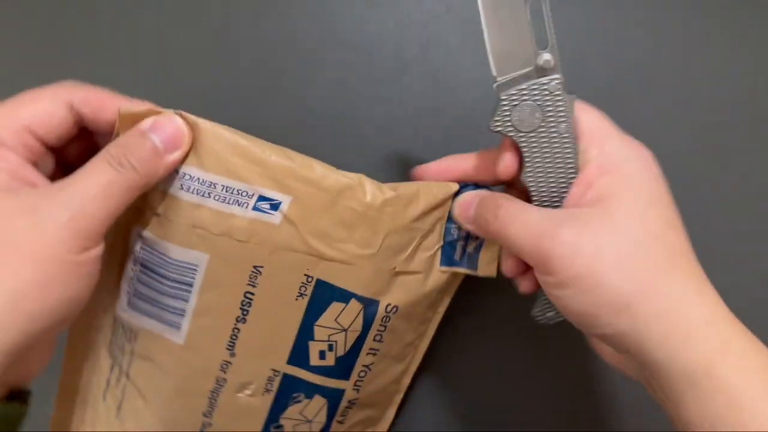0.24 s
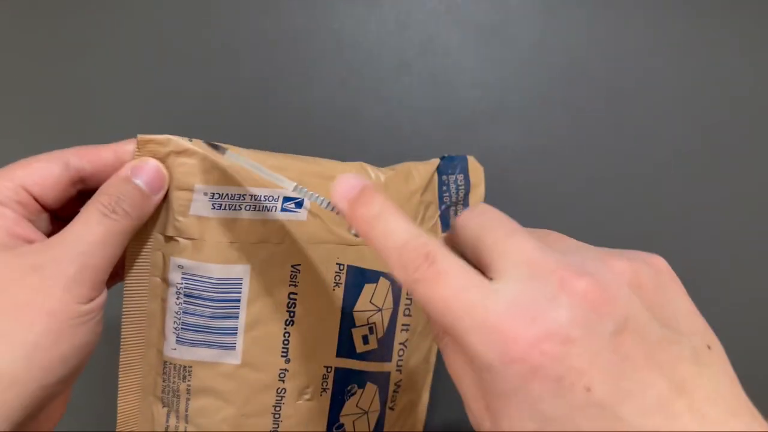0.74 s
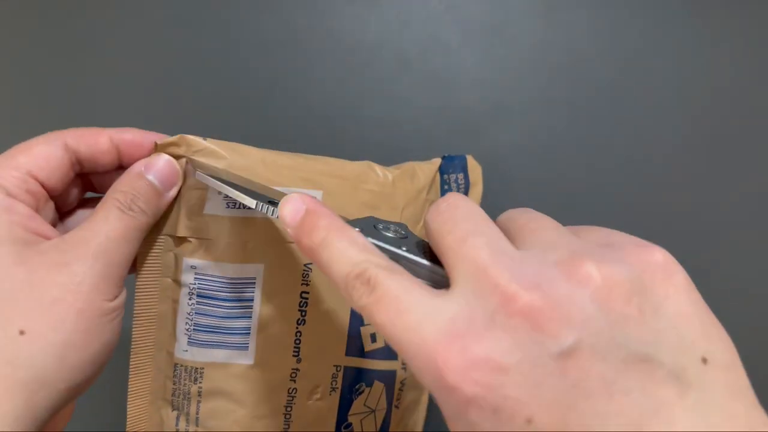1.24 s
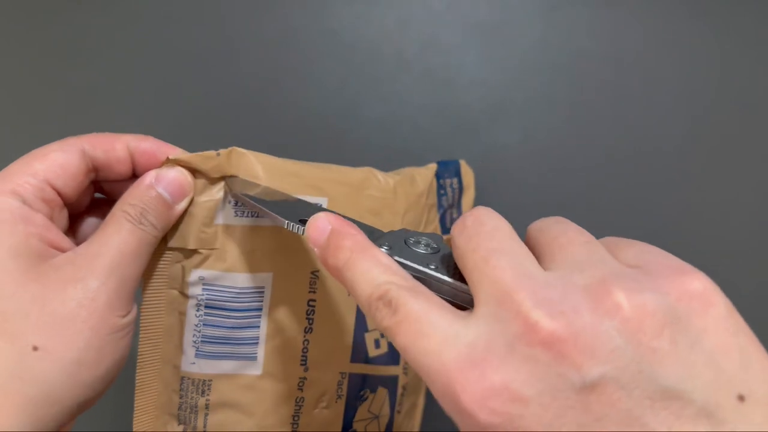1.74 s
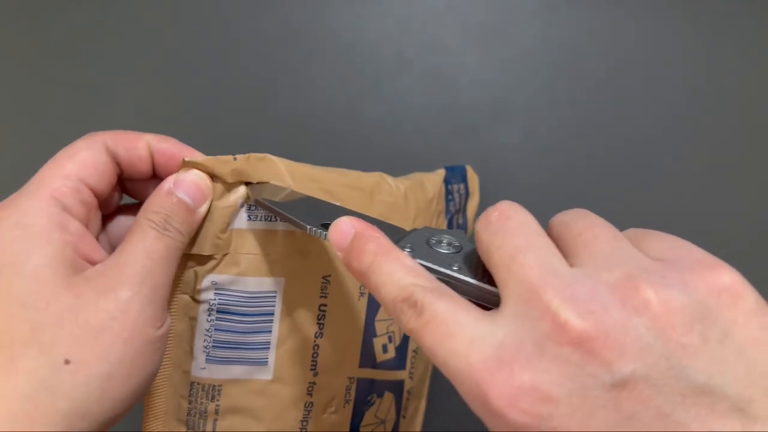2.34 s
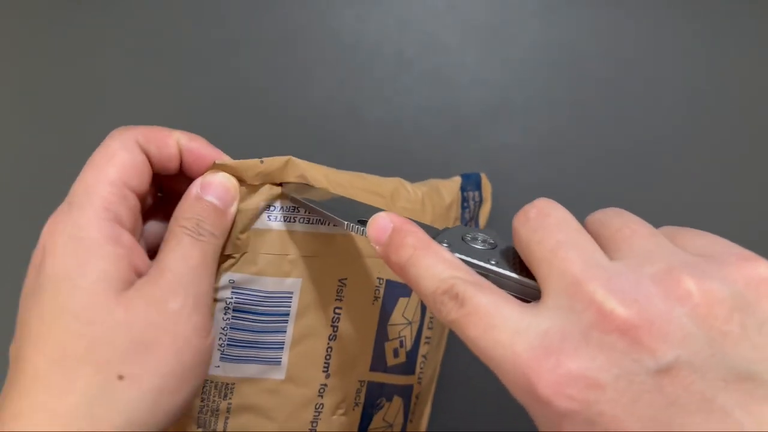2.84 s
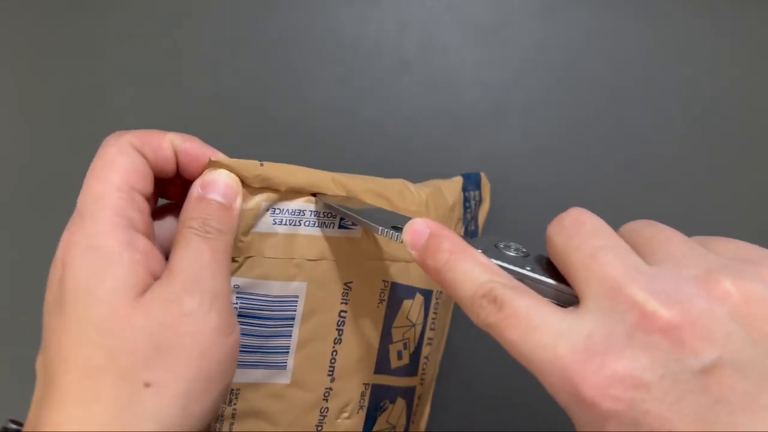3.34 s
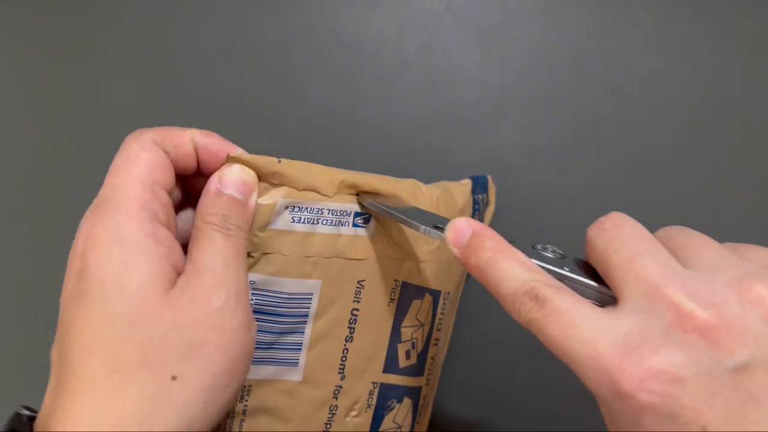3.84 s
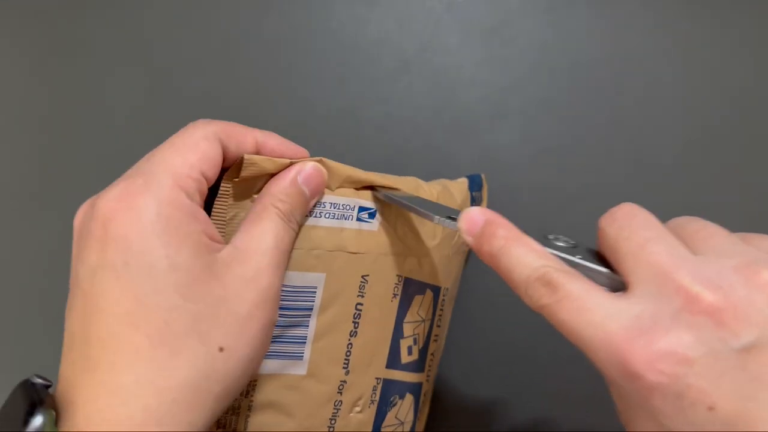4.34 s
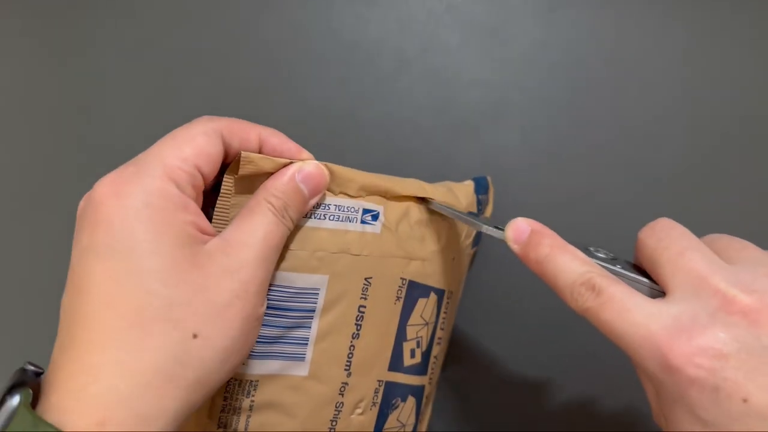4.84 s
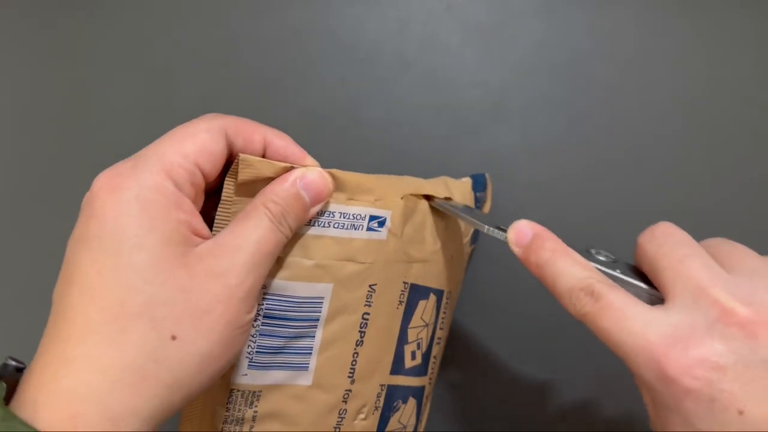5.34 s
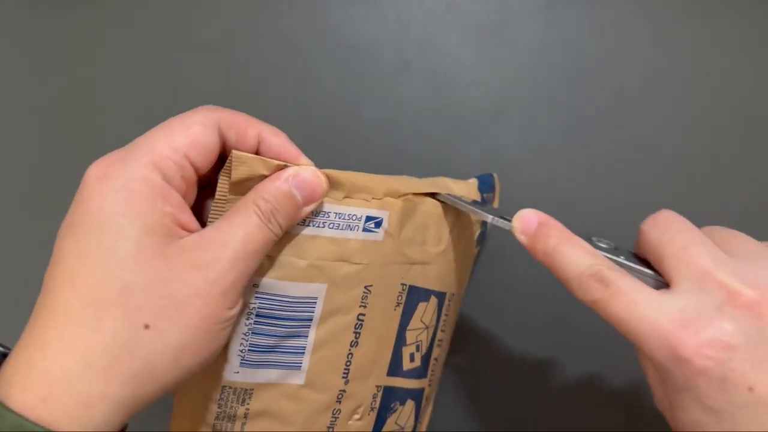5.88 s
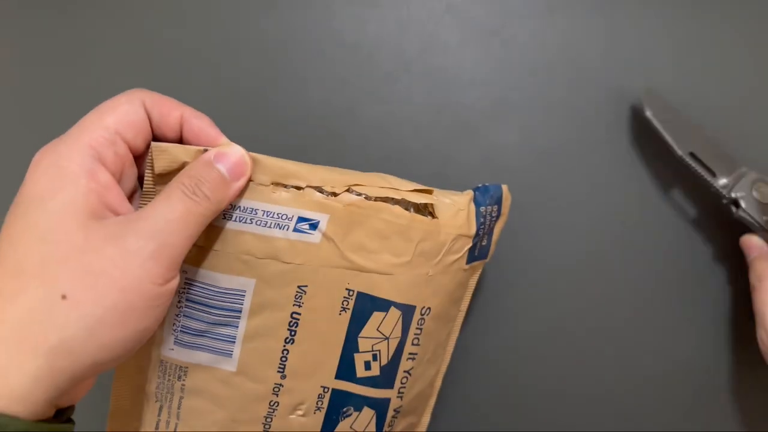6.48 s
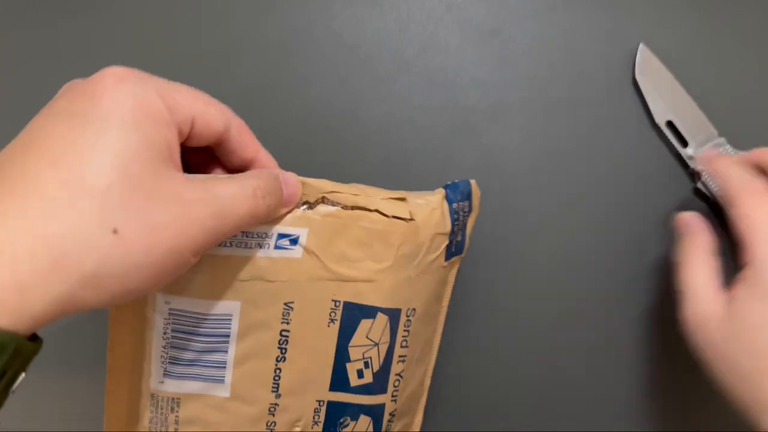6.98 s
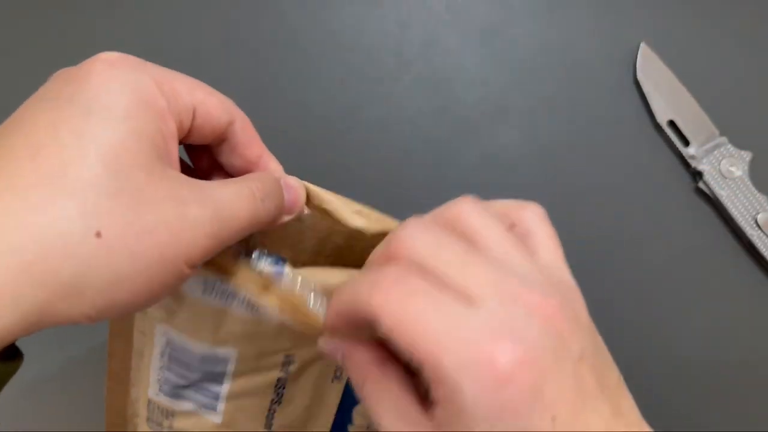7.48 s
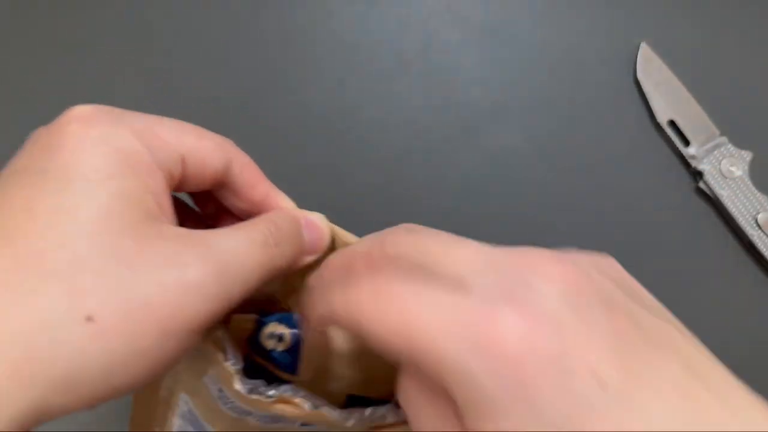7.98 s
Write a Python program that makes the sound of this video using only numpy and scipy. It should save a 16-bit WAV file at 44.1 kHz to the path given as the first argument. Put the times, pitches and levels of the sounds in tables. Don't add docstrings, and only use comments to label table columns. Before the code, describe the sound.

A padded paper mailer crackles in sharp irregular bursts as a blade slits its edge, then is pulled open and rummaged through, close up.

```python
import sys
import numpy as np
from scipy import signal
from scipy.fft import rfft, irfft, next_fast_len
from scipy.io import wavfile
from scipy.ndimage import uniform_filter1d

SR = 44100
rng = np.random.default_rng(int(sys.argv[2]) if len(sys.argv) > 2 else 0)


def voltage_ratio(level):
    return 10 ** (np.asarray(level, float) / 20)


def put_to_file(sound):
    columns = np.atleast_2d(sound).T
    safe = np.clip(columns, -1, 1)
    whole_steps = np.round(safe * 32767)
    wavfile.write(sys.argv[1], SR, whole_steps.astype(np.int16))


N = 362281

# (pitch [Hz], level per Hz [dB])
AIR = [(30, 20.5), (60, 14.5), (120, 14), (400, 6), (850, -6), (2200, -21), (4900, -10.5), (7300, -13),
       (10000, -25), (13000, -46), (16000, -6)]
# (time [s], held [s], rustle level [dB], fine part [dB])
MOVES = [(.0, 0.12, -48, -3), (0.132, 0.075, -47, 2), (0.299, 0.16, -54, 0), (1.0, 0.12, -64, -20),
         (1.505, 0.075, -56.5, 3), (2.036, 0.12, -66.5, 11.5), (2.28, 0.028, -61.5, 5.5),
         (2.432, 0.038, -56, 5.5), (2.71, 0.16, -57.5, 6), (2.96, 0.2, -56.5, 1), (3.25, 0.033, -54.5, 1),
         (3.41, 0.023, -58, 6), (3.57, 0.13, -58.5, -2), (3.828, 0.26, -53.5, 3.5),
         (4.198, 0.2, -55.5, 1.5), (4.5, 0.2, -62.5, 2), (4.658, 0.065, -63.5, 9), (4.79, 0.073, -54, 2.5),
         (5.093, 0.035, -52, 5.5), (5.287, 0.026, -48, -1), (5.46, 0.094, -53, -3), (5.73, 0.064, -51, -2),
         (5.891, 0.093, -42, -8), (6.04, 0.065, -52, -1), (6.33, 0.063, -56.5, 0), (6.559, 0.17, -60, 0),
         (6.81, 0.016, -55, 2), (6.86, 0.092, -51, 0), (7.112, 0.2, -49, 5), (7.24, 0.35, -49.5, 1.5),
         (7.38, 0.19, -44, 8), (7.66, 0.088, -55, 7), (7.81, 0.37, -49.5, 5.5)]
# (pitch [Hz], level [dB])
PAPER = [(60, -24), (230, -9.5), (400, 1.5), (1100, -3.5), (2000, 3.5), (3300, -1.5), (5200, 2.5),
         (7500, 3.5), (10000, 9), (12500, -12), (15500, 3)]
# (time [s], peak [dB], bright
# share [dB])
TICKS = [(.0839, -23, -14), (.1098, -21, -3), (.1203, -28, -2), (.1733, -18.5, -1.5),
         (.2202, -13, -10.5), (.2392, -29, -13), (.2526, -24.5, -30), (.3782, -28, 8), (.4268, -49, -23),
         (.5176, -33.5, -3), (.6031, -33, -4.5), (.6893, -31.5, -32), (.7612, -25, -33),
         (.7848, -30, -6), (.8164, -27.5, -14), (.8241, -35, 3), (.8489, -28, -2), (.9989, -25, -31),
         (1.0158, -23, -5.5), (1.0845, -40, 3), (1.1691, -30, -7), (1.2568, -23.5, -1.5),
         (1.422, -39, -9),
         (1.5047, -35, -61), (1.5507, -22.5, -1.5), (1.6141, -26, -16), (1.636, -40.5, 20),
            (1.6597, -30.5, -12), (1.6747, -34, 17), (1.827, -44, 9), (1.9575, -49.5, 14.5),
            (2.0357, -23.5, -5.5), (2.0605, -29, -5), (2.0795, -19.5, 2.5), (2.111, -27.5, 0.5),
            (2.2801, -33.5, -20), (2.2943, -22, -2), (2.4418, -27, -36), (2.4884, -14.5, -24),
            (2.5058, -19.5, -3.5), (2.7198, -27.5, -61), (2.7425, -17.5, 3.5), (2.841, -27.5, 1),
            (2.858, -22, -5.5), (2.8749, -31, -16), (2.9097, -21, 1),
         (3.266, -30, -13), (3.3142, -21.5, -1), (3.412, -19.5, -1.5), (3.425, -21, -1.5),
           (3.878, -28.5, -47), (3.9808, -22, -7), (4.0541, -24, -3), (4.0822, -21.5, -1.5),
           (4.2093, -19.5, -2), (4.224, -51, -16), (4.262, -42, -1), (4.319, -24.5, -5), (4.333, -24, -6),
           (4.3665, -23.5, -8), (4.598, -29.5, -1.2), (4.6485, -20, -2.5), (4.7754, -26, -1),
           (4.977, -32.5, -16), (5.0173, -25.5, -11), (5.2082, -27, -8), (5.3588, -27.5, -12),
           (5.463, -26, -14), (5.5558, -27, -2.5), (5.585, -28.5, -15), (5.7215, -27, -10),
           (5.745, -26, -14), (6.0155, -18.5, -6.5),
         (6.0954, -26, -15), (6.1529, -48, 15), (6.3173, -47, 11), (6.355, -27, -7.5),
            (6.4248, -32.5, -26), (6.198, -35.5, 6.5), (6.5703, -37, 12.5), (6.583, -23, -15),
            (6.6238, -30.5, -5), (6.8257, -37, -33), (6.8576, -30.5, -7), (6.94, -24.5, -4),
            (7.0146, -30.5, -7), (7.1162, -25.5, -13), (7.1718, -25.5, -13), (7.2212, -26, -4)]
# (time [s], peak [dB], bright share [dB], pouch boom [dB])
SLITTING = [(2.962, -18.5, -11, -14), (2.9858, -17, -22, -11), (3.0024, -8.5, -4.5, -7),
            (3.008, -18, 3.5, -4.5), (3.0208, -13, -11, -4), (3.0302, -15, -5, -2), (3.045, -21, -12, -1.5),
            (3.185, -16.5, -1.5, -17.5), (3.2933, -26, -14, -12), (3.459, -19, -7, -34),
            (3.4703, -13, -37, 3.5), (3.4814, -15, -11, -24), (3.4898, -14.5, -5.5, 0),
            (3.5175, -5, -3, -13.5), (3.531, -25, 8, -19), (3.5726, -14.5, -1.5, 3),
            (3.8102, -18.5, -2, -13.5), (4.0022, -22, -0.5, -8.5), (4.299, -14.5, -7, 0),
            (4.409, -25, -5.5, -5)]
# (time [s], peak [dB], bright share [dB], pouch boom [dB])
JERKING = [(4.4769, -12.5, -24, -4), (4.497, -11.5, -18, -9), (4.502, -26, -17, -17), (4.507, -14, -28, -1),
           (4.5118, -4.5, -27, -3), (4.515, -11, -30, 5), (4.53, -19.5, -6, -2), (4.5307, -25, -18, -14),
           (4.8028, -17.5, -1.7, -10), (4.82, -13, -14, -13), (4.8256, -16.5, -7, -5),
           (4.8476, -10, -9.5, -8.5), (5.103, -24.5, -9.5, -5), (5.1159, -26, -2.5, -14),
           (5.1211, -19, -4.5, -26), (5.1694, -23.5, -1.5, -0.5), (5.3021, -24.5, -18, -0.5),
           (5.4871, -8.5, -11, -10.5), (5.4966, -21, -12, -16), (5.5122, -11, -6.5, -7.5),
           (5.804, -22, -8, -18), (5.862, -16.5, -18, -26.5), (5.8938, -13.5, -10.5, -4),
           (5.9, -15.5, -18, -10.5), (5.916, -2.5, -22, -14), (5.9342, -6, -7, -1.5),
           (6.8864, -17.5, -7, 6)]
# (time [s], peak [dB], bright share [dB])
OPENING = [(7.2464, -20, -2), (7.2642, -35, 6), (7.2844, -20, -1), (7.3569, -27, -19), (7.3759, -33, -13),
           (7.3965, -15, -21), (7.4123, -17.5, 1), (7.4187, -12.5, -13), (7.435, -22, 1),
           (7.4775, -18.5, -4), (7.5134, -18, -23), (7.5503, -24, -12), (7.5785, -29, -9),
           (7.5795, -22, -12), (7.6817, -21, -19), (7.8153, -41, 19), (7.8386, -20.5, -26),
           (7.8848, -32.5, 12), (7.9302, -33, 9), (7.9776, -26, -27), (8.0774, -21.5, -6),
           (8.0935, -24.5, -2.5), (8.1401, -28.5, 5), (8.1829, -15.5, -1.5)]
# (time [s], peak [dB], pitch
# [Hz])
POPS = [(0.0276, -28, 1580), (0.0369, -28, 1610), (0.1275, -26, 1800), (0.0945, -30, 4040),
        (0.1004, -28, 3940), (0.1284, -31, 4350), (0.1665, -25.5, 530), (0.2526, -22.5, 2750),
        (0.1668, -26, 5000), (0.2946, -29.5, 2300), (0.3677, -41, 2720), (0.3959, -34, 6300),
        (0.4265, -31.5, 1430), (0.4625, -32, 5600), (0.1105, -17, 3500), (0.6888, -33, 1320),
        (0.7738, -36, 950), (0.7845, -21, 1700), (1.0242, -37, 2640), (1.3653, -35.5, 6480),
        (1.5171, -27.5, 1560), (1.541, -32, 4400), (1.5749, -31, 3080), (1.5894, -26, 6480),
        (1.6137, -24, 2280), (1.6738, -3, 8630), (1.7645, -31, 8000), (1.6355, -35, 1500),
        (1.9174, -36, 5440), (2.9105, -29, 1920), (2.1362, -26, 4770), (2.141, -31, 4580),
        (3.0205, -18, 805), (2.3085, -36, 4430), (2.4414, -20.5, 2000), (2.1105, -16.5, 5200),
        (2.4648, -28, 3250), (2.0787, -10.5, 4500), (2.7323, -41, 6810), (2.7423, -19.5, 6200),
        (2.7902, -26, 6200), (2.928, -25, 4880), (3.0135, -21, 3500), (3.1813, -28, 5200),
        (3.2945, -15, 3660),
        (3.3082, -24, 2300), (3.381, -32, 5970), (3.4416, -25, 2800), (3.4456, -25, 2120),
             (3.4815, -12, 1720), (3.491, -16, 3480), (3.559, -21, 2760), (3.565, -26, 4420),
             (3.7031, -32.5, 2880), (3.8458, -30, 635), (3.4595, -18, 1800), (3.9984, -26.5, 1670),
             (4.0224, -29, 2750), (4.0477, -30, 1620), (4.064, -27, 3500), (4.0714, -27, 2580),
             (4.1954, -23, 8100), (3.472, -22.5, 400), (4.4775, -18, 794), (4.223, -24, 2600),
             (4.2619, -24.5, 2720), (4.294, -18, 1950), (4.3227, -24, 3520), (4.35, -20, 5550),
             (4.5255, -19, 1780), (4.5974, -21, 6460), (4.8475, -15, 3550), (4.7948, -23, 3820),
             (4.835, -26, 1120), (4.8698, -29, 6550), (5.9153, -6.5, 4140), (4.935, -33.5, 3750),
             (5.4885, -19.5, 807), (5.1141, -18, 3730), (5.1455, -27, 3500), (5.1745, -20, 3570),
             (5.935, -15, 4230), (4.8215, -20, 424), (5.2922, -25.5, 3660), (5.3311, -28, 1880),
             (5.4575, -27, 2600), (5.4797, -18, 3230), (5.5055, -26, 3600), (5.7506, -29, 2810),
             (5.7818, -30, 2710), (5.805, -19, 2980),
        (6.0017, -32, 1610), (5.923, -21, 450), (6.054, -28.5, 6430), (6.156, -30, 6890),
             (6.2307, -27, 7600), (6.317, -27.5, 7700), (6.3358, -30, 4100), (6.621, -18, 7140),
             (6.8157, -26, 2160), (6.8562, -28.5, 2910), (6.8755, -23, 6000), (6.888, -25, 725),
             (7.1615, -24, 3470), (7.2645, -30, 1800), (7.2643, -25, 6600), (7.2809, -24, 4800),
             (7.376, -24, 3500), (7.401, -25, 4800), (7.4077, -19, 3050), (7.4118, -26, 2207),
             (7.4348, -23, 7000), (7.4517, -17, 2360), (7.4716, -23, 2670), (7.5088, -20, 2980),
             (7.531, -18, 7420), (7.536, -20, 3200), (7.547, -25, 3400), (7.571, -23, 2360),
             (7.5781, -19, 5400), (7.601, -22.5, 2215), (7.6819, -19, 1760), (7.4005, -19, 7500),
             (7.831, -23, 4290), (7.836, -31, 2320), (7.8595, -24, 1810), (7.4195, -22, 7500),
             (7.924, -27, 5110), (7.935, -32, 6520), (7.941, -32, 8600), (8.0091, -29, 8000),
             (7.5255, -25, 3500), (8.0866, -25, 5250), (8.1154, -23, 4000), (8.1331, -20.5, 2730),
             (8.157, -23, 6780), (8.1631, -19, 4370), (8.2026, -24, 2590), (4.477, -14.5, 4850),
             (4.515, -7, 5370), (4.5117, -21, 2580), (1.6594, -24, 2100)]
# (time [s], peak [dB], pitch 10 ms later [Hz])
BUCKLES = [
    (7.7345, -34, 126.4),
    (2.487, -34.5, 262),
    (.03, -44, 57),
    (7.93, -43.5, 120),
    (7.14, -39, 46),
    (7.82, -45, 57),
]
# (time [s], peak [dB], deep part [dB], favoured pitch [Hz])
THUMPS = [(3.02, -25.5, -10.5, 420), (3.463, -40, -13, 368), (3.57, -27, -13, 360), (4.296, -33, -26, 300),
          (4.512, -12.5, -45, 286), (4.819, -25, -21, 405), (5.112, -31.5, -11.5, 250),
          (5.509, -36.5, -12, 293), (5.925, -18.5, -3, 400), (6.507, -45, -0.5, 300),
          (6.646, -33.5, -4, 308), (6.875, -23.5, -9, 300), (6.886, -8, -12.5, 316),
          (6.924, -18.5, -7, 248), (6.954, -27.5, 0.5, 240)]
# (pitch [Hz], level [dB], time to fall 60 dB [s])
DESK = [(52, -36, 0.07), (100, -7.5, 0.11), (137.3, 0, 0.08), (200, -41, 0.091), (244, -3, 0.1),
        (294.5, 4, 0.065), (371.6, -3, 0.1), (500, -16, 0.029), (795, 7, 0.018)]
# (pitch [Hz], time to fall 60 dB [s])
ROOM = [(300, 0.47), (1500, 0.15), (6000, 0.27), (14000, 0.057)]
# (pitch [Hz], phase [radians])
PORT_LEAD = [(0, 0), (300, .15), (650, .75), (1000, .3), (3600, .3), (5080, .9), (7320, -.7), (11300, -2.7),
             (12700, -2.8), (13800, -3.6), (15500, -3.8)]

AIR_DB, HUM_DB, HUM_HZ = -62.5, -66, 120
RISE_DB_PER_S, FALL_DB_PER_S = 358, 149
RESTING_DB, RESTING_FINE_DB = -70, 1
RUMBLE_DB, JOLT_RUMBLE_DB, JOLT_FALL_DB_PER_S = -5.5, -34.5, 64
CROWD_DB, CROWD_SPREAD_DB, CROWD_BRIGHT_DB = 7.5, 1.5, -9.5
CLUMP_S = .008
TICK_BOOM_DB, BOOM_PER_DULL = -22, .3
OPEN_BOOM_DB = -9
PATCH_DB = 1.3
FAVOUR_DB_PER_OCTAVE = 13
SWAY_DB = .7
TOP_HZ = 16150


def rms_one(x):
    return x / np.sqrt(np.mean(x ** 2) + 1e-20)


def at_hz(points, hz):
    points = np.array(points)
    return np.interp(np.log(hz), np.log(points[:, 0]), points[:, 1])


def drift(rate):
    r = np.exp(-80 * np.pi * rate / SR)
    coarse = rng.standard_normal(N // 40 + 2002)
    slow = signal.lfilter([1], [1, -2 * r, r * r], coarse)[2000:]
    return np.interp(np.arange(N) / 40, np.arange(len(slow)), rms_one(slow))


def ring(clicks, hz, t60):
    r, w = voltage_ratio(-60 / (t60 * SR)), 2 * np.pi * hz / SR
    poles = np.convolve([1, -2 * r * np.cos(w), r * r], [1, -np.exp(-w / 2)])
    return signal.lfilter([0, np.sin(w), -np.sin(w)], poles, clicks + 1e-18)


def by_zone(hz, low, middle, high):
    to_mid = np.clip(np.log2(hz / 650), 0, 1)
    to_high = np.clip(np.log2(hz / 3200), 0, 1)
    return low + (middle - low) * to_mid + (high - middle) * to_high


def air():
    hz = np.maximum(np.fft.rfftfreq(N, 1 / SR), 1)
    spectra = rfft(rng.standard_normal((3, N))) * voltage_ratio(at_hz(AIR, hz))
    shared, left, right = rms_one(irfft(spectra, N))
    phase = 2 * np.pi * HUM_HZ * np.arange(N) / SR + 1.5 * drift(5)
    hum = voltage_ratio(HUM_DB + 4 * drift(5)) * np.sin(phase)
    return voltage_ratio(AIR_DB) * shared + hum, voltage_ratio(AIR_DB + 4.0) * np.array([left, right])


def swells(time, start, held, level_db, rise, fall, resting_db):
    early = np.maximum(start[:, None] - time, 0)
    late = np.maximum(time - (start + held)[:, None], 0)
    each_db = level_db[:, None] - rise * early - fall * late
    return 10 * np.log10(voltage_ratio(2 * each_db).sum(axis=0) + voltage_ratio(2 * resting_db))


def handling():
    time = np.arange(0, N / SR, .005)
    s, held, level_db, fine_db = np.transpose(MOVES)
    middle = swells(time, s, held, level_db, RISE_DB_PER_S, FALL_DB_PER_S, RESTING_DB)
    high = swells(time, s, held, level_db + fine_db, RISE_DB_PER_S, FALL_DB_PER_S,
                  RESTING_DB + RESTING_FINE_DB)
    jolt_s, jolt_db = np.transpose(THUMPS)[:2]
    low = swells(time, jolt_s, 0, jolt_db + JOLT_RUMBLE_DB, RISE_DB_PER_S, JOLT_FALL_DB_PER_S,
                 middle + RUMBLE_DB)
    return time, middle, high, low


def all_creases(count):
    ticks = np.array(TICKS)
    ticks = np.column_stack([ticks, TICK_BOOM_DB - BOOM_PER_DULL * ticks[:, 2]])
    pulls = np.column_stack([OPENING, np.full(len(OPENING), OPEN_BOOM_DB)])
    time, middle, _, _ = handling()
    latest_s = N / SR - .01
    s = rng.uniform(0, latest_s, count)
    size = rng.exponential(1, count)
    colour = rng.standard_normal((2, count))
    clump_start = np.repeat(s[::3], 3)[:count]
    s = clump_start + CLUMP_S * rng.exponential(1, count) * (np.arange(count) % 3)
    s = np.minimum(s, latest_s)
    peak_db = np.interp(s, time, middle) + CROWD_DB + CROWD_SPREAD_DB * np.minimum(size, 2)
    crowd = np.column_stack([s, peak_db, CROWD_BRIGHT_DB + 9 * colour[0], -9 + 6 * colour[1]])
    return np.vstack([ticks, SLITTING, JERKING, pulls, crowd])


def strain(flips, before_s, after_s):
    s, peak_db = flips[:, :2].T
    load = np.zeros(N)
    load[(s * SR).astype(int)] = voltage_ratio(peak_db)
    around = np.arange(-3000, 3001) / SR
    shape = np.where(around < 0, .4 * np.exp(around / before_s), np.exp(-around / after_s))
    return np.abs(signal.fftconvolve(load, shape, "same"))


def rustle(flips, per_s, size_db, clump_db, cycles, strain_db):
    s, middle, high, low = handling()
    time = np.arange(0, N, 32) / SR
    loaded = voltage_ratio(strain_db) * strain(flips, before_s=.004, after_s=.01)
    born = rng.random(N) < per_s * voltage_ratio(clump_db * drift(30)) / SR
    sizes = born * voltage_ratio(size_db * np.minimum(rng.exponential(1, N), 4.0)) * rng.choice([-1, 1], N)
    pitches, out = np.geomspace(65, 15800, 24), np.zeros(N)
    centre = rng.uniform(-3, 27, N)
    patches = [drift(14)[::32] for _ in range(9)]
    for k, hz in enumerate(pitches):
        grains = ring(sizes * (np.abs(centre - k) < 2), hz, 0.0015 + cycles / hz)
        grains = rms_one(ring(grains, hz, 5 / hz))
        patch_db = PATCH_DB * (patches[k // 3] + patches[(k + 1) // 3])
        level_db = np.interp(time, s, by_zone(hz, low, middle, high)) - 8.0 + patch_db
        level = np.repeat(voltage_ratio(level_db), 32)[:N]
        out += grains * (level + loaded * (hz > 500)) * voltage_ratio(0.39 * at_hz(PAPER, hz))
    return out


def pops(trim_db, fade_db_per_octave, cycles, shortest_s):
    s, peak_db, hz = np.array(POPS).T[:, :, None, None]
    luck = rng.standard_normal((len(s), 3, 11, 1))
    octaves = np.linspace(-1.6, 1.6, 11)[:, None] + .1 * luck[:, 0]
    near = np.minimum(hz * 2 ** octaves, 15500)
    age = np.maximum(np.arange(600) / SR - 1 / near - .0002 * np.abs(luck[:, 2]), 0)
    fade_db = fade_db_per_octave * np.abs(octaves) + 60 * age / (shortest_s + cycles / near)
    gain = voltage_ratio(4.5 * luck[:, 1] - fade_db)
    signs = (-1.) ** np.arange(11)[:, None]
    waves = np.sum(gain * np.sin(2 * np.pi * near * age) * signs, axis=1)
    waves *= voltage_ratio(peak_db[:, 0] + trim_db) / np.abs(waves).max(axis=1, keepdims=True)
    out = np.zeros(N + 600)
    np.add.at(out, (s[:, 0] * SR).astype(int) + np.arange(600), waves)
    return out[:N]


def buckles(rise_s, t60):
    age, out = np.arange(1, SR // 8) / SR, np.zeros(N + SR)
    for s, peak_db, hz in BUCKLES:
        wave = np.sin(2 * np.pi * hz * .01 * np.log(age / .001 + 1))
        swell = voltage_ratio(peak_db + 7.5 - 60 * age / t60) * (1 - np.exp(-age / rise_s))
        out[int(s * SR):][:len(age)] += swell * wave
    return out[:N]


def snaps(flips, cycles, shortest_s, spread_db, wave_lag_s, smear_s, after_db):
    s, peak_db, bright_db, boom_db = flips.T
    dull_db = 10 * np.log10(np.clip(1 - voltage_ratio(2 * bright_db), .01, 1))
    pitches, out = np.geomspace(230, 15800, 30), np.zeros(N)
    luck = rng.standard_normal((len(s), 3, 3, len(pitches)))
    luck[:, 1, 2] = luck[:, 1, 2, :1] * (-1.) ** np.arange(len(pitches))
    luck[:, :, 0] -= luck[:, :, 0].mean(axis=-1, keepdims=True)
    slips = [(-.0009, -21, 4.4), (0, -2.5, .7), (.0018, after_db, 10)]   # (delay [s], level [dB], looseness)
    for k, hz in enumerate(pitches):
        level_db = peak_db - 7.5 + by_zone(hz, boom_db, dull_db, bright_db) + at_hz(PAPER, hz)
        clicks = np.zeros(N)
        for slip, (late_s, slip_db, loose) in enumerate(slips):
            late = late_s + wave_lag_s * 1000 / hz + smear_s * loose * luck[:, slip, 1, k]
            at = np.clip(((s + late) * SR).astype(int), 0, N - 1)
            height = voltage_ratio(level_db + slip_db + spread_db * luck[:, slip, 0, k])
            np.add.at(clicks, at, height * np.sign(luck[:, slip, 2, k]))
        out += ring(clicks, hz, shortest_s + cycles / hz)
    return out


def thumps(spread_db, detune, rise_s, scuff_db):
    hz, level_db, t60 = np.transpose(DESK)[:, :, None]
    age, out = np.arange(SR // 4) / SR, np.zeros(N + SR)
    dull = signal.butter(2, [70, 900], "band", fs=SR, output="sos")
    for s, peak_db, deep_db, favoured_hz in THUMPS:
        luck = rng.standard_normal((3, len(DESK), 1))
        away_db = -FAVOUR_DB_PER_OCTAVE * np.abs(np.log2(hz / favoured_hz))
        tilt_db = np.where(hz < 170, deep_db + 9.5, away_db)
        gain = voltage_ratio(level_db + tilt_db + spread_db * luck[0] - 60 * age / np.clip(t60, .02, .2))
        phase = 2 * np.pi * hz * (1 + detune * luck[1]) * age + luck[2]
        modes = np.sum(gain * np.sin(phase), axis=0)
        scuff = signal.sosfilt(dull, rng.standard_normal(len(age))) * voltage_ratio(scuff_db - 60 * age / 0.12)
        soft_start = 1 - np.exp(-age / rise_s)
        out[int(s * SR):][:len(age)] += voltage_ratio(peak_db - 5.5) * (modes + scuff) * soft_start
    return out[:N]


def room(near_db, near_t60_s):
    age = np.arange(SR // 2) / SR
    white, tail = rng.standard_normal((3, len(age))), 0
    edges = 40 * 2. ** np.arange(10)
    for low, high in zip(edges, edges[1:]):
        octave = signal.butter(2, [low, high], "band", fs=SR, output="sos")
        tail = tail + signal.sosfilt(octave, white) * voltage_ratio(-60 * age / at_hz(ROOM, 1.4 * low))
    scatter = white * voltage_ratio(near_db - 60 * age / near_t60_s)
    tail = (tail + scatter) * np.clip(age / 0.0046 - .3, 0, 1)
    return tail / np.sqrt(np.sum(tail[0] ** 2))


def ports(x):
    size = next_fast_len(N + 4096)
    hz, lead = np.transpose(PORT_LEAD)
    half = np.interp(np.fft.rfftfreq(size, 1 / SR), hz, lead) / 2
    return irfft(rfft(x, size) * np.exp(1j * half * [[1], [-1]]), size)[:, :N]


def top_gate(x, bands):
    hz, time, frames = signal.stft(x.mean(axis=0), SR, nperseg=512)
    shut = np.zeros(frames.shape, bool)
    for low_hz, high_hz, rise_db in bands:
        inside = (hz > low_hz) & (hz < high_hz)
        level_db = 10 * np.log10(np.mean(np.abs(frames[inside]) ** 2, axis=0) + 1e-20)
        chance = np.interp(time * SR, np.arange(N), drift(4))
        shut[inside] |= level_db - uniform_filter1d(level_db, size=40) + 4 * chance < rise_db
    return x - signal.istft(frames * shut, SR, nperseg=512)[1][:N]


def scene():
    shared, own = air()
    flips = all_creases(count=480)
    grains = rustle(flips, per_s=9000, size_db=2.2, clump_db=3.0, cycles=3.5, strain_db=-36.0)
    popping = pops(trim_db=-4.0, fade_db_per_octave=12.0, cycles=4.2, shortest_s=0.0037)
    buckling = buckles(rise_s=0.0037, t60=0.051)
    creases = snaps(flips, cycles=5.0, shortest_s=.0015, spread_db=4.0, wave_lag_s=.001,
                    smear_s=.00007, after_db=-10)
    no_bass = signal.butter(2, 190, "high", fs=SR, output="sos")
    creases = signal.sosfilt(no_bass, creases)
    jolts = thumps(spread_db=2.0, detune=0.047, rise_s=0.0019, scuff_db=-1.0)
    close = creases + grains + jolts + popping + buckling

    echoes = room(near_db=3.5, near_t60_s=0.05)
    wet = signal.fftconvolve(close[None], echoes, axes=1)[:, :N]
    between = signal.butter(2, [350, 7000], "band", fs=SR, output="sos")
    apart = signal.sosfilt(between, voltage_ratio(-12.0) * wet[1:] + own)
    sway = voltage_ratio(SWAY_DB * drift(40) * [[1], [-1]])
    return ports(close + shared + voltage_ratio(-20.5) * wet[0]) * sway + apart


def roll_off(x):
    return signal.sosfilt(signal.butter(12, 17150, fs=SR, output="sos"), x)


def record(dry):
    firm = signal.sosfilt(signal.butter(4, 42, "high", fs=SR, output="sos"), dry)
    firm = signal.sosfilt(signal.cheby2(14, 40, TOP_HZ, fs=SR, output="sos"), firm)
    firm = top_gate(firm, [(10400, 13800, -2), (11000, 13800, 3), (12000, 13800, 4),
                           (13800, 14800, 2), (13800, SR / 2, -2)])
    return roll_off(firm)


dry = scene()
out = record(dry)
put_to_file(out)
```